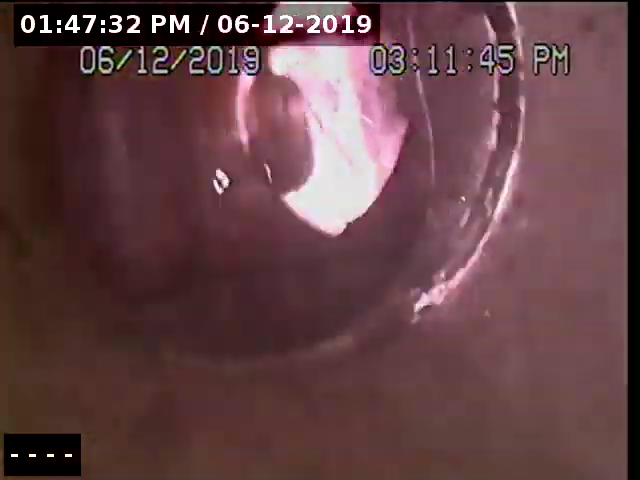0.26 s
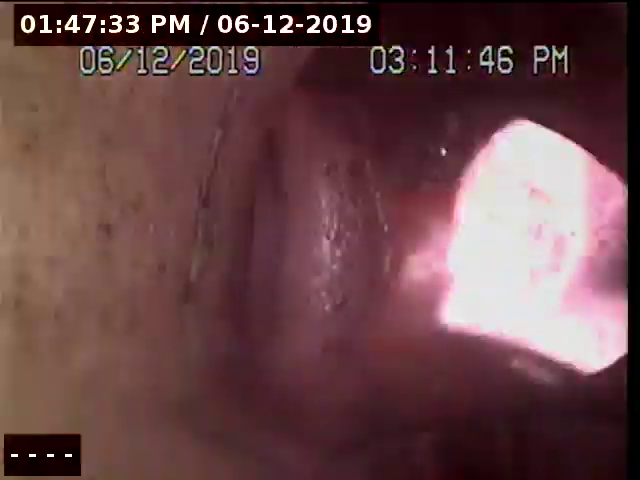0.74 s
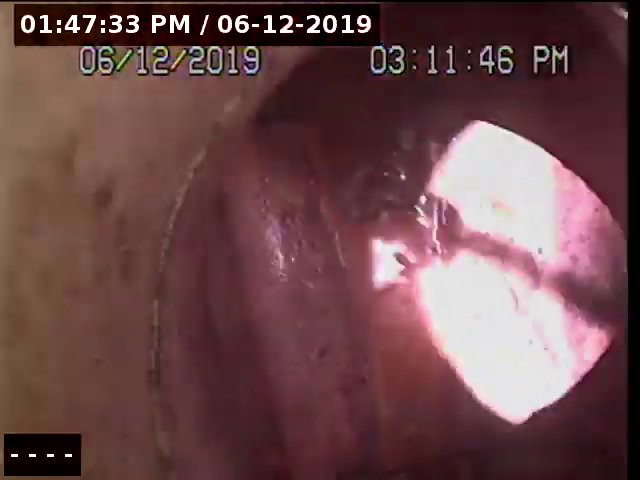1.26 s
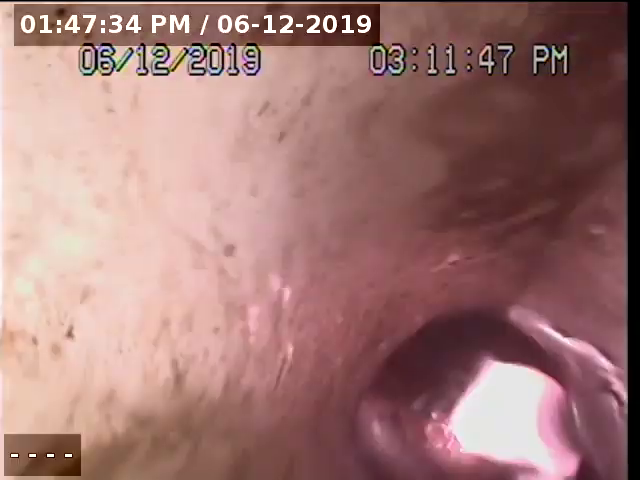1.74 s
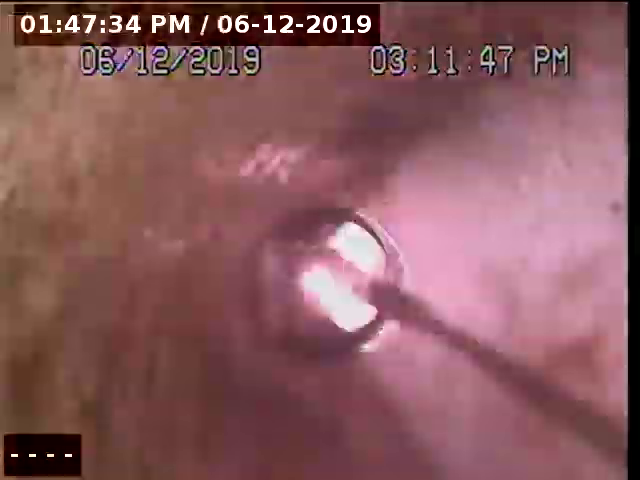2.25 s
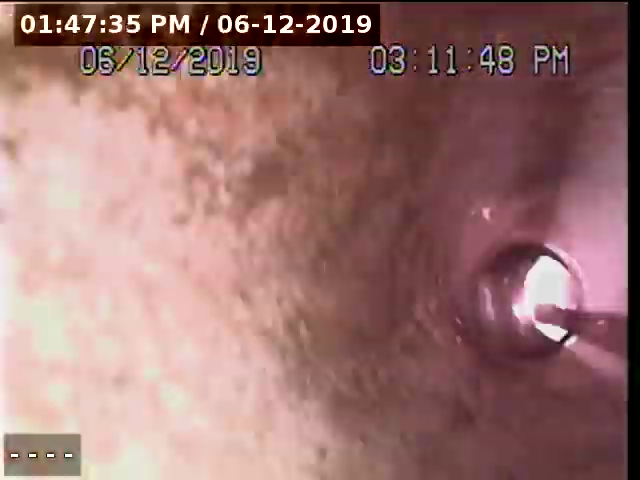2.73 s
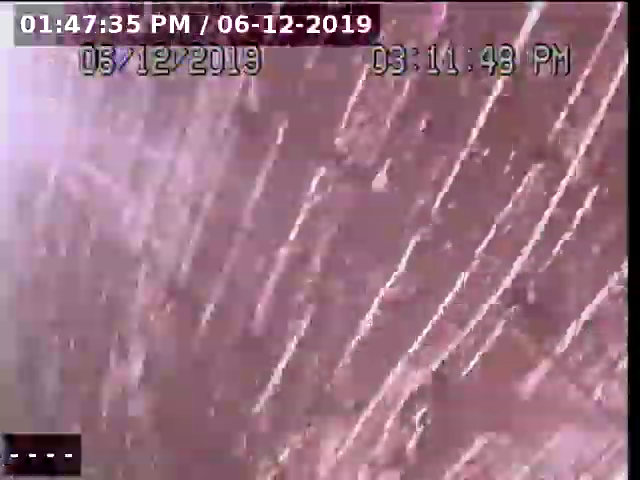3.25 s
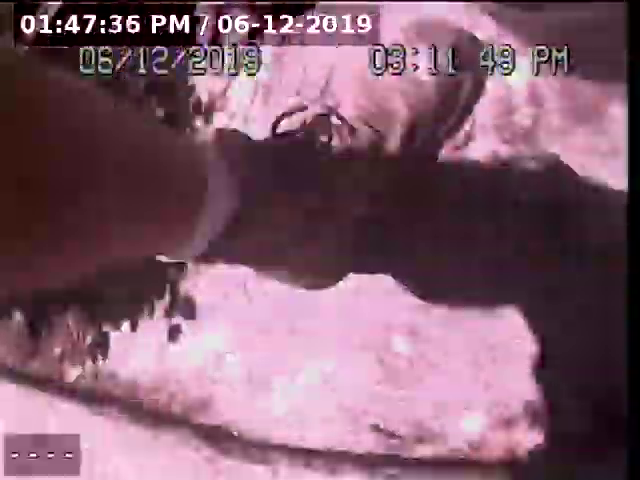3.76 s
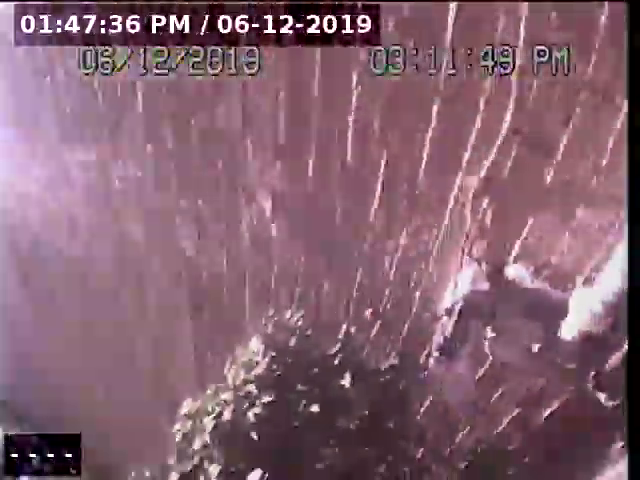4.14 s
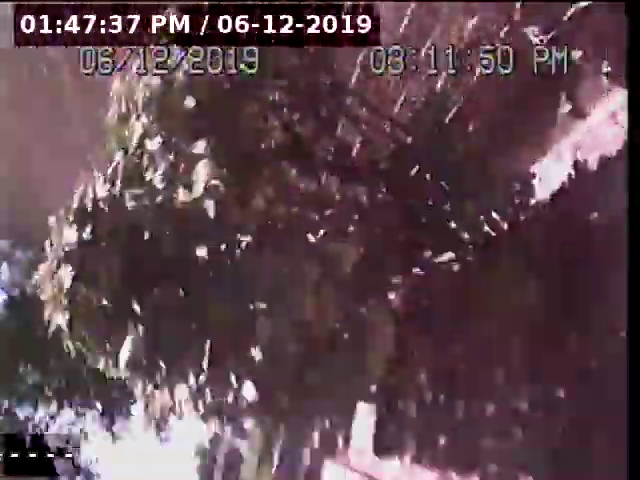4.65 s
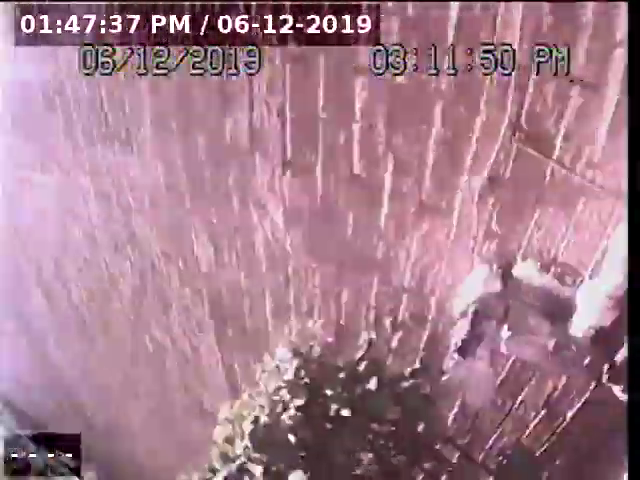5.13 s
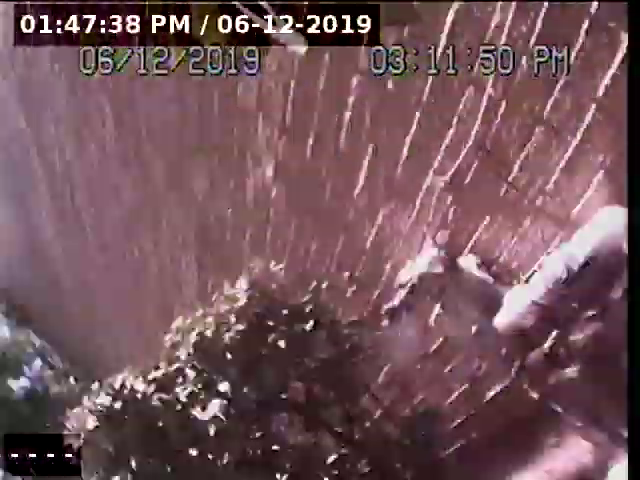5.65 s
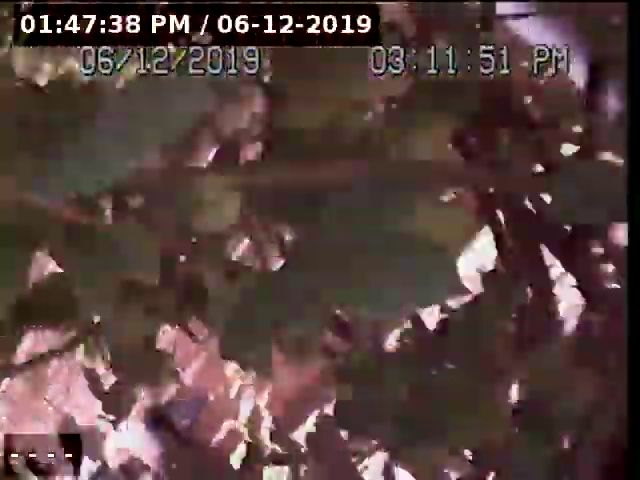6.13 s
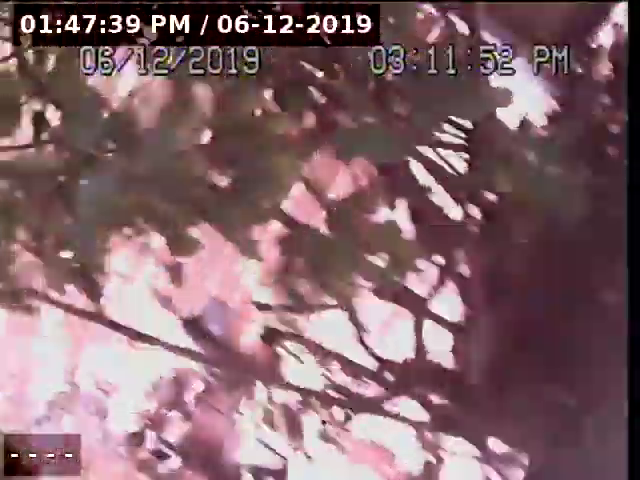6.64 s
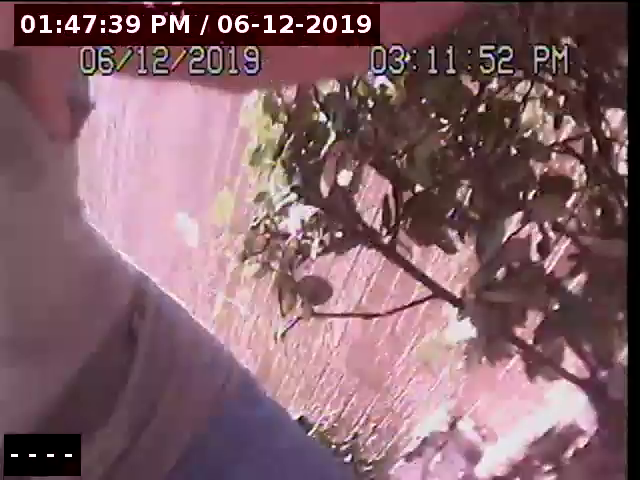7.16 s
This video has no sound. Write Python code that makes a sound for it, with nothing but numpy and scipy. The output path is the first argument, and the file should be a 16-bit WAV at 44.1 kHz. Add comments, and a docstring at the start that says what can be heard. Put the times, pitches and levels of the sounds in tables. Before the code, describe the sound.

A stiff cable is dragged from a drain pipe with clicks, knocks and scrapes, then hard booming jolts near the end and a brief dropout.

```python
"""An inspection camera's push cable is hauled out of a drain, sliding, clicking and chattering on pipe and reel.
Its head leaves the pipe at 2.85 s and contacts gain bass; each is a noise burst through a coloured filter.
Near 5 s a run of hard jolts booms in the recorder's case as swept sines and rings the steel reel frame.
Then a comb sweeps down through the scraping hiss, a thin whistle swells, and the sound cuts out once near 6 s.
Throughout, the small microphone squashes loud peaks, lacks a band near 4 kHz and stops short of 9 kHz."""
import sys
import numpy as np
from scipy import signal
from scipy.fft import rfft, irfft, next_fast_len
from scipy.io import wavfile
from scipy.ndimage import map_coordinates

SR = 44100
rng = np.random.default_rng(int(sys.argv[2]) if len(sys.argv) > 2 else 0)


def pcm_store(signal):
    """Save signal as 16-bit PCM."""
    levels = np.round(np.clip(np.atleast_2d(signal), -1, 1) * 32767)
    wavfile.write(sys.argv[1], SR, levels.astype(np.int16).T)


N = 325987

# cable contacts: (time [s], relative level [dB], clack near 1.4 kHz [dB], snap near 3 kHz [dB]);
# clack and snap are set against the body of the contact at 300-900 Hz
CONTACTS = [(0.198, -31, -4, -29), (0.237, -51, 15.5, -6), (0.302, -45, -6, -5), (0.475, -31, 6, -8.5),
            (0.658, -37.5, 14, -4), (0.702, -26, -20, -46), (0.75, -24, -18, -18), (0.767, -29.5, -9, -22),
            (0.822, -25.5, 0.5, -17), (0.954, -41, -2, -10.5), (1.001, -34.5, -4, -16.5),
            (1.272, -33, 2, -23), (1.357, -19.5, 1.5, -14.5), (1.408, -23, -10.5, -28),
            (1.527, -40.5, 1, -20), (1.54, -17, -4, -17.5), (1.55, -19, -11.5, -17), (1.794, -30, -6, -9.5),
            (1.841, -27, -1.5, -16.5), (1.889, -40.5, -1, -10), (1.947, -31.5, -2, -19.5),
            (1.963, -22, -12, -32), (1.983, -30, -6, -17), (2.001, -27, -5, -23), (2.053, -37, -5, -16),
            (2.26, -24, -18, -17), (2.319, -29.5, -20, -18), (2.526, -15.5, -16.5, -16.5),
            (2.567, -28.5, -6.5, -16.5), (2.626, -27, -5.5, -26.5), (2.797, -32, -7, -11),
            (2.973, -26, -4, -22), (3.008, -37.5, 7.5, -21), (3.023, -37, -12, -8.5),
            (3.194, -37.5, 1, -12), (3.306, -36, -4, -11), (3.345, -32.5, -11, -23), (3.857, -42, 7.5, 3.5),
            (4.413, -35, -9.5, -23), (4.431, -31.5, -32, -34), (4.674, -29.5, 3, -20),
            (4.697, -35, -1, -16), (4.822, -32.5, -3.5, -31), (4.898, -28.5, -2, -20), (4.91, -19, 0, -11),
            (4.924, -21, -7.5, -22.5), (5.031, -15.5, 5.5, -10.5), (5.039, -18.5, 8.5, -8),
            (5.05, -20.5, 5.5, -11), (5.081, -16, -18, -20.5), (5.101, -23.5, -10, -12),
            (5.122, -18, -0.5, -18.5), (5.226, -15.5, 0.5, -18.5), (5.356, -19, 0, -21),
            (5.433, -31.5, -1, -14), (5.565, -25.5, 11.5, 0.5), (5.677, -25, -8.5, -36),
            (6.109, -31.5, -13, -21), (6.152, -36.5, -2.5, -24), (6.641, -22, -6, -20),
            (6.66, -23.5, -9.5, -27), (6.726, -36.5, -7, -10.5), (7.112, -29.5, -7, -22),
            (7.148, -30.5, -8, -29)]
# the cable judders over an edge: (time [s], length [s], relative level [dB], hardness [dB])
JUDDERS = [(0.734, 0.065, -32, -1.5), (0.826, 0.096, -47, -1.5), (1.959, 0.038, -31, -0.5),
           (2.057, 0.052, -34.5, 3.5), (2.258, 0.043, -33.5, 8.5), (2.9, 0.067, -36, 1.5),
           (2.972, 0.068, -35.5, 3.5), (4.933, 0.053, -30.5, 5.5), (5.071, 0.083, -19, -4.5),
           (5.29, 0.029, -26, -2), (5.355, 0.064, -32, 2.5), (5.482, 0.038, -28, -0.5),
           (5.514, 0.058, -20.5, 0.5), (6.69, 0.068, -37, -6), (6.845, 0.041, -34, -6.5)]
# jolts of the case: (time [s], level [dB], settled pitch [Hz], rise time constant [s], t60 [s])
CASE_JOLTS = [(0.745, -26, 196, 0.0031, 0.13), (2.01, -31.5, 213, .008, 0.18),
              (3.0, -28, 172, 0.0054, 0.092), (4.919, -2, 229, 0.0059, 0.04), (4.953, -18, 222, .008, 0.11),
              (5.038, -1, 208, 0.0043, 0.11), (5.098, -2.5, 228, 0.0037, 0.036),
              (5.119, -3.5, 214, 0.0058, 0.16), (5.226, -1.5, 222, 0.0045, 0.07),
              (5.295, -9, 210.6, 0.018, 0.065), (5.359, -8, 221.5, 0.0033, 0.12),
              (5.399, -20.5, 225, 0.0057, 0.17), (5.506, -9.5, 226, 0.017, 0.17),
              (5.596, -16, 212, 0.0049, 0.089), (5.674, -12.5, 220, 0.001, 0.085)]
# modes of the steel reel frame: (frequency [Hz], relative level [dB], t60 [s])
FRAME_MODES = [(680, -12, 0.14), (1174, 1, 0.14), (1373, 5, 0.2), (1460, 0.5, 0.41), (1800, -6.5, 0.13),
               (2229, -9.5, 0.14), (2446, -10, 0.33), (2969, -14.5, 0.31)]
# peaks and hollows of the housing round the microphone: (frequency [Hz], width [Hz], gain [dB])
HOUSING_MODES = [(206, 28, 6.5), (264, 64, -12), (338, 84, 2), (860, 79, 3), (1159, 33, 7.5),
                 (1210, 180, -3.5), (1476, 98, 5.5), (1567, 57, -15.5), (1738, 120, 4.5), (2140, 272, 7.5),
                 (2550, 330, 6.5), (2958, 100, 5)]
# how hard the cable is hauled: (time [s], effort [dB])
PULL_EFFORT = [(0, -0.5), (0.13, -8.5), (0.24, 0.5), (0.42, -4), (0.8, 5), (1.1, -2.5), (1.42, 4.5),
               (1.72, -5), (2.03, 1), (2.3, 2), (2.8, 0.5), (3.0, 3.5), (3.55, 0.5), (4.55, -5),
               (4.84, -1.5), (4.96, 15), (5.6, 10.5), (5.82, 2), (6.7, 1.5), (7.0, -2), (7.39, 5.5)]
# the cable binds and rubs louder: (time [s], length [s], starting level [dB])
BINDING = [(0.32, 0.5, -39), (1.22, 0.37, -34.5), (4.12, 0.1, -46)]
# patches of fine grit dragged under the cable: (time [s], length [s], starting level [dB])
GRIT_PATCHES = [(0.0, 0.013, -49.5), (0.48, 0.084, -49), (0.74, 0.4, -54.5), (1.56, 0.53, -59.5),
                (2.06, 0.064, -54.5), (2.26, 0.12, -52.5), (2.4, 0.22, -64), (3.15, 0.1, -52),
                (3.3, 0.84, -57.5), (5.65, 1.32, -58), (7.2, 0.19, -55.5)]
# pitch of the rubbing, wandering mostly upward until 4.25 s: (time [s], pitch [Hz])
RUBBING_PITCH = [(0, 632), (0.55, 660), (0.8, 463), (1.4, 577), (2.0, 660), (2.6, 850), (3.6, 880),
                 (4.25, 945), (4.5, 787)]
# colour of the rubbing round its pitch: (multiple of the pitch [ratio], relative level [dB])
RUB_COLOUR = [(.15, -16.5), (.45, -5), (.78, -1.5), (1, 1.5), (1.18, -2.5), (1.8, -14), (4, -62)]
# colour of the cable rumbling on the reel: (frequency [Hz], relative level [dB])
RUMBLE_COLOUR = [(20, -38), (60, -16.5), (110, -3), (160, 4), (210, 2), (280, 0.5), (450, -14.5),
                 (1500, -69)]
# colour of the scraping over the pipe rim: (frequency [Hz], relative level [dB])
SCRAPE_COLOUR = [(500, -18.5), (1100, 2), (1500, 1.5), (2100, -7.5), (2900, -8.5), (3500, -9.5),
                 (4500, -30.5), (8000, -44.5)]
# colour of the dragged grit: (frequency [Hz], relative level [dB])
FIZZ_COLOUR = [(2500, -27.5), (4000, -10), (5000, -1.5), (6500, -2), (7400, -6.5), (8000, -13.5),
               (8700, -25)]
# colour of the outdoor air and microphone hiss: (frequency [Hz], relative level [dB])
HISS_COLOUR = [(20, -11.5), (60, -5), (160, 3.5), (300, 17.5), (900, -1), (1500, -1), (3000, -14),
               (5000, -10.5), (7200, -2.5), (8700, -46)]
# how long the nearby walls answer: (frequency [Hz], t60 [s])
YARD_DECAY = [(100, 0.089), (220, 0.43), (700, 0.27), (2000, 0.16), (8000, 0.085)]
# the sound is cut between these: (start time [s], end time [s])
CUT_OUT = (5.9136, 6.0413)

TOP_HZ = 8764  # upper edge of the recorder's band
FREE_S = 2.85  # the camera head comes out of the pipe
THUD_IN_PIPE_DB, THUD_FREE_DB = -6.5, 2  # contacts gain bass once it is out
SCRAPE_THUD_DB = 8  # a judder is heavier than a single contact
SUB_DB = -12.5  # a steady deep bass heard with every contact [dB]
TICK_DB, TICK_CLACK_DB, TICK_SNAP_DB = -48.5, 4.5, -10.5  # stray light taps inside the pipe
# a judder of hardness 0; a harder one gains more snap than clack
SCRAPE_CLACK_DB, SCRAPE_CLACK_PER_HARDNESS, SCRAPE_SNAP_DB = -2.5, 0.62, -18
# layers of the sliding cable: (level at ordinary effort [dB], gain per dB of effort [dB])
RUMBLE_DB, RUMBLE_GROWS = -46, 0.94
RUB_DB, RUB_GROWS = -45, 0.68
SCRAPE_DB, SCRAPE_GROWS = -47.5, 1.0
FIZZ_DB, FIZZ_GROWS = -63, 0.3
BIND_ATTACK_S, BIND_RELEASE_S, BIND_SLOPE_DB_PER_S = 0.04, 0.038, 3.5
GRIT_ATTACK_S, GRIT_RELEASE_S, GRIT_SLOPE_DB_PER_S = 0.012, 0.014, -3.5


def knocks(size=8192, first=0.44, hold_s=.0035, t60_s=0.047, bounce=0.19, level_db=43, chatter_top_hz=4500):
    """Each contact is one sharp blow and a duller chatter of smaller ones that holds briefly and dies."""
    track, t = np.zeros(N), np.arange(size) / SR
    for s, db, clack, snap in CONTACTS + ticks():
        chatter = touches(size, rate=5000, spiky=0.2) * amp(-60 * np.maximum(t - hold_s, 0) / t60_s)
        chatter *= 1 - np.exp(-t / 0.00021)  # the cable takes a moment to press home
        chatter /= np.linalg.norm(chatter)
        force = filtered(chatter, lambda hz: 1 / np.hypot(1, hz / chatter_top_hz))
        force[round(.0012 * SR)] += first
        # the blow runs along the free length of cable and returns, giving each knock its own hollow pitch
        trip = round(rng.uniform(0.002445, .0055) * SR)
        returned = np.pad(force, (trip, 0))[:size]
        force = (force + bounce * returned) / np.hypot(1, bounce)
        add(track, s, amp(db + level_db) * struck(force, thud_at(s), clack, snap))
    return track


def ticks(count=6):
    """Light taps at chance moments while the head is in the pipe, as rows like the contacts."""
    return [(rng.uniform(0, FREE_S), TICK_DB, TICK_CLACK_DB, TICK_SNAP_DB) for _ in range(count)]


def scrapes(size=16384, level_db=15):
    """Each judder is a dense run of slips that swells and fades."""
    track, t = np.zeros(N), np.arange(size) / SR
    for s, length, db, hardness in JUDDERS:
        stroke = np.sqrt(np.abs(np.sin(np.pi * np.minimum(t / length, 1))))
        force = stroke * unit(touches(size, rate=2500, spiky=0.4))
        clack = SCRAPE_CLACK_DB + SCRAPE_CLACK_PER_HARDNESS * hardness
        snap = SCRAPE_SNAP_DB + hardness
        add(track, s, amp(db + level_db) * struck(force, thud_at(s) + SCRAPE_THUD_DB, clack, snap))
    return track


def touches(size, rate, spiky):
    """Tiny contacts of very uneven strength, rate a second on average."""
    strength = rng.standard_normal(size) * np.exp(spiky * rng.standard_normal(size))
    return strength * (rng.random(size) < rate / SR)


def thud_at(s):
    """Bass of a contact in dB: light inside the pipe, heavy outside."""
    return THUD_IN_PIPE_DB if s < FREE_S else THUD_FREE_DB


def struck(force, thud, clack, snap):
    """A contact force heard through the housing; thud, clack and snap set its colour."""
    hz = np.fft.rfftfreq(len(force), 1 / SR)
    colour = [(25, SUB_DB), (90, SUB_DB), (190, thud), (450, 0),
              (800, 0.27 * clack + 1), (1400, clack - 1),
              (2400, snap - 1), (3100, snap + 0.5), (3600, snap - 6),
              (4700, snap - 11), (7000, snap - 10.5), (8600, snap - 26)]
    return irfft(rfft(force) * causal(amp(along(colour, hz)) * housing(hz)))


def housing(hz):
    """Each resonance of the housing lifts or hollows its own narrow band."""
    gain_db = sum(db / (1 + ((hz - centre) / (width / 2)) ** 2) for centre, width, db in HOUSING_MODES)
    return amp(gain_db)


def jolts(upper_db=-10, upper_ratio=1.3, sag=0.021, shove_db=-26):
    """The case booms in two low modes that start slightly sharp and settle, over a dull shove."""
    track, t = np.zeros(N), np.arange(SR // 2) / SR
    for s, db, hz, rise, t60 in CASE_JOLTS:
        swell = (1 - np.exp(-(t / rise) ** 2)) * amp(-60 * t / t60)
        phase = 2 * np.pi * np.cumsum(hz * (1 + sag * np.exp(-t / 0.0093))) / SR
        upper = np.sin(upper_ratio * phase + rng.uniform(0, 2 * np.pi))
        boom = np.sin(phase) + amp(upper_db) * upper
        shove = unit(filtered(rng.standard_normal(len(t)), lambda f: 1 / (1 + (f / 170) ** 4)))
        add(track, s, amp(db) * swell / swell.max() * (boom + amp(shove_db) * shove))
    return track


def frame(boom, ring_db=-24, loose=0.41):
    """While the case shakes, the loose reel frame buzzes, even on weak shaking, and rings on."""
    t = np.arange(SR // 2) / SR
    ring = sum(amp(db - 60 * t / t60) * np.sin(2 * np.pi * hz * t) for hz, db, t60 in FRAME_MODES)
    buzz = np.abs(boom) ** loose * rng.standard_normal(N)  # a power below 1 favours weak shaking
    return amp(ring_db) * signal.fftconvolve(buzz, ring / np.linalg.norm(ring))[:N]


def slide():
    """One effort drives the cable: it rumbles on the reel, rubs the pipe, scrapes its rim and drags grit."""
    effort_db = np.interp(np.arange(N) / SR, *np.transpose(PULL_EFFORT))
    binding = strokes(BINDING, BIND_ATTACK_S, BIND_RELEASE_S, BIND_SLOPE_DB_PER_S)
    grit = strokes(GRIT_PATCHES, GRIT_ATTACK_S, GRIT_RELEASE_S, GRIT_SLOPE_DB_PER_S)
    rumble = amp(RUMBLE_DB + RUMBLE_GROWS * effort_db) * friction(RUMBLE_COLOUR, rate=43, grain_db=1.5)
    rub = np.hypot(amp(RUB_DB + RUB_GROWS * effort_db), binding) * rubbing()
    scrape = amp(SCRAPE_DB + SCRAPE_GROWS * effort_db) * friction(SCRAPE_COLOUR, rate=350, grain_db=2.0)
    fizz_gain = np.hypot(amp(FIZZ_DB + FIZZ_GROWS * effort_db), grit)
    fizz = fizz_gain * friction(FIZZ_COLOUR, rate=150, grain_db=2.5)
    return rumble + rub + phasing(scrape + fizz)


def strokes(rows, attack, release, slope_db):
    """Gain of the strokes: each rises, holds with a steady drift and dies away."""
    gain = np.zeros(N)
    for s, length, db in rows:
        t = np.maximum(np.arange(N) / SR - s, 0)
        held = amp(db + slope_db * np.minimum(t, length))
        fade = np.exp(-np.maximum(t - length, 0) / release)
        gain += held * np.minimum(t / attack, 1) * fade
    return gain


def friction(spectrum, rate, grain_db):
    """Rubbing noise of rms 1 whose level wavers as it catches and slips, on rate random knots a second."""
    slips = rng.standard_normal(N) * amp(grain_db * wobble(rate))
    return unit(filtered(slips, lambda hz: amp(along(spectrum, hz)) * housing(hz)))


def rubbing(grain_db=2):
    """A broad friction resonance that follows the rubbing pitch."""
    slips = rng.standard_normal(N) * amp(grain_db * wobble(110))
    hz, t, z = signal.stft(slips, SR, nperseg=1024)
    pitch = np.interp(t, *np.transpose(RUBBING_PITCH))
    shape = amp(along(RUB_COLOUR, hz[:, None] / pitch))
    resonant = signal.istft(z * shape, SR, nperseg=1024)[1][:N]
    return unit(filtered(resonant, housing))


def phasing(x, start_s=5.7, near_s=0.00103, far_s=0.00188):
    """From start_s a close reflection draws away and sweeps a comb down through the hiss."""
    t = np.arange(N) / SR
    delay = np.interp(t, [start_s, N / SR], [near_s, far_s])
    return x + .4 * (t > start_s) * map_coordinates(x, [(t - delay) * SR])


def whistle(centre_hz=7350, width_hz=300, level_db=-61):
    """A thin whistly band of noise, faint at first, comes and goes in the late hiss."""
    swell = np.interp(np.arange(N) / SR, [5.6, 5.75, 6.3, 6.8, 7.3], [0.18, 1.0, 0.48, .6, 1.35])
    band = filtered(rng.standard_normal(N), lambda hz: 1 / (1 + (2 * (hz - centre_hz) / width_hz) ** 2))
    return amp(level_db) * swell * unit(band)


def yard(x):
    """Nearby walls answer briefly, as a noise tail whose treble dies first."""
    hz, t, z = signal.stft(rng.standard_normal(SR // 2), SR, nperseg=256)
    decay = amp(-60 * t / along(YARD_DECAY, hz)[:, None])
    tail = signal.istft(z * decay, SR, nperseg=256)[1]
    tail = np.pad(tail, (round(.006 * SR), 0))  # the walls stand a little way off
    return signal.fftconvolve(x, tail / np.linalg.norm(tail))[:N]


def background(level_db=-56):
    """Steady outdoor air and microphone hiss, as coloured noise."""
    return amp(level_db) * unit(filtered(rng.standard_normal(N), lambda hz: amp(along(HISS_COLOUR, hz))))


def amp(db):
    """Decibels to gain."""
    return 10 ** (np.asarray(db) / 20)


def unit(x):
    """Scale to rms 1."""
    return x / np.sqrt(np.mean(x ** 2) + 1e-20)


def along(points, hz):
    """(frequency, value) points read on a log axis."""
    f, v = np.transpose(points)
    return np.interp(np.log(hz + 1), np.log(f + 1), v)


def wobble(rate):
    """A smooth random curve, rate knots a second."""
    knots = rng.standard_normal(int(N * rate / SR) + 4)
    return map_coordinates(knots, [np.arange(N) * rate / SR])


def filtered(x, response):
    """x times a response of frequency, padded so the end does not wrap onto the start."""
    m = next_fast_len(len(x) + 8192)
    return irfft(rfft(x, m) * response(np.fft.rfftfreq(m, 1 / SR)), m)[:len(x)]


def causal(gain):
    """The minimum-phase response with this gain, so that a blow rings after it and not before."""
    cepstrum = irfft(np.log(np.maximum(gain, 1e-6)))
    half = len(cepstrum) // 2
    cepstrum[1:half] *= 2
    cepstrum[half + 1:] = 0
    return np.exp(rfft(cepstrum))


def add(track, s, sound):
    """Mix a sound in at time s."""
    part = track[round(s * SR):][:len(sound)]
    part += sound[:len(part)]


def scene():
    """Contacts, scrapes and frame ring with their echo, and the case boom, over the sliding cable."""
    boom = jolts()
    hits = knocks() + scrapes() + frame(boom)
    echo = amp(-12.5) * yard(hits)
    return (hits + boom + echo + slide() + whistle() + background())[None]


def record(dry, notch_hz=4020, notch_half_width_hz=640, trough=0.85):
    """The microphone squashes troughs before crests; the recorder notches 4 kHz, cuts out once and limits the band."""
    x = dry[0]
    ceiling = np.where(x > 0, 1, trough)
    x = x / (1 + np.abs(x / ceiling) ** 4) ** (1 / 4)

    def notch(hz):
        """A resonant hollow that falls silent at its centre."""
        off_centre = notch_hz ** 2 - hz ** 2
        return off_centre / (off_centre + 2j * hz * notch_half_width_hz)

    x = filtered(x, notch)
    t = np.arange(N) / SR
    x = x * ((t < CUT_OUT[0]) | (t > CUT_OUT[1]))
    x = filtered(x, lambda hz: 1 / (1 + (hz / TOP_HZ) ** 80))
    return np.clip(x, -1, 1)[None]


dry = scene()
out = record(dry)
pcm_store(out)
```